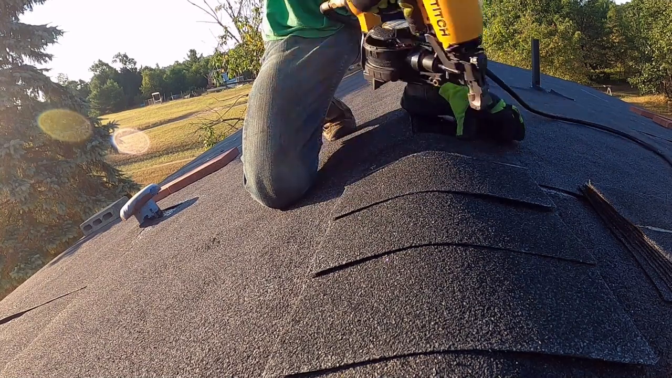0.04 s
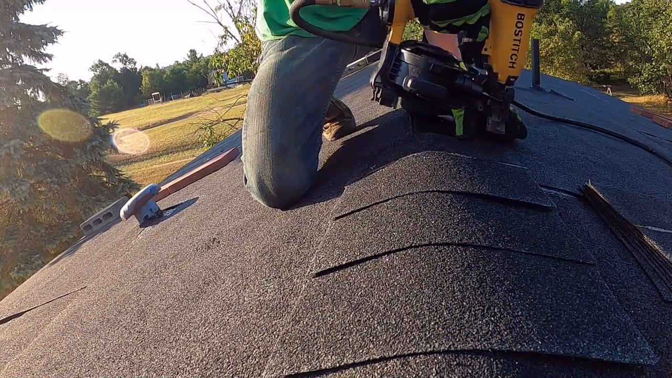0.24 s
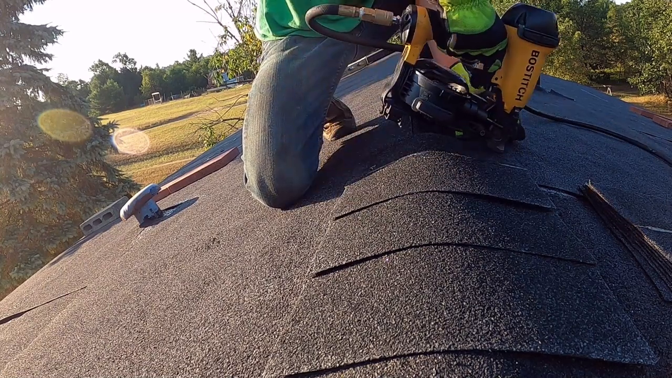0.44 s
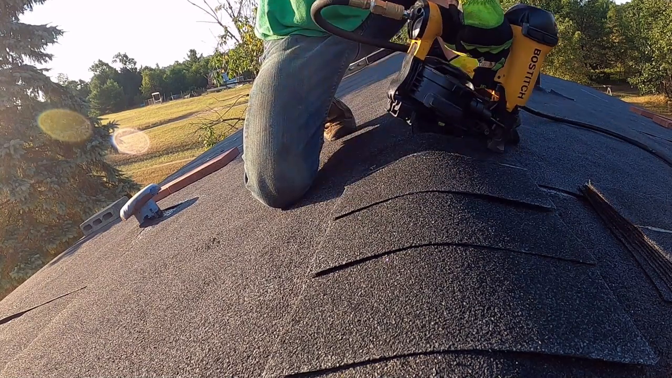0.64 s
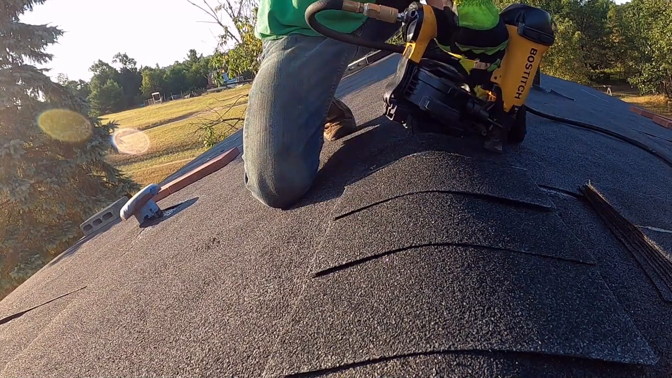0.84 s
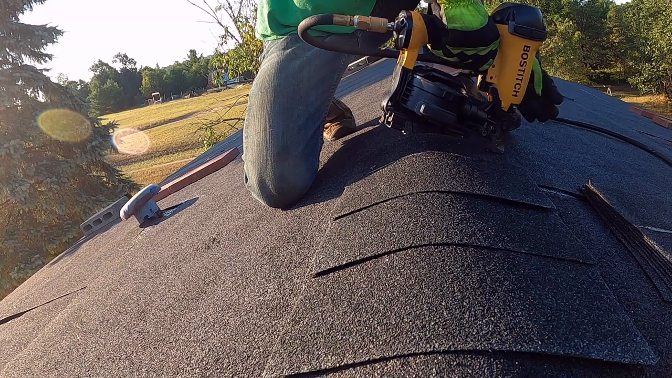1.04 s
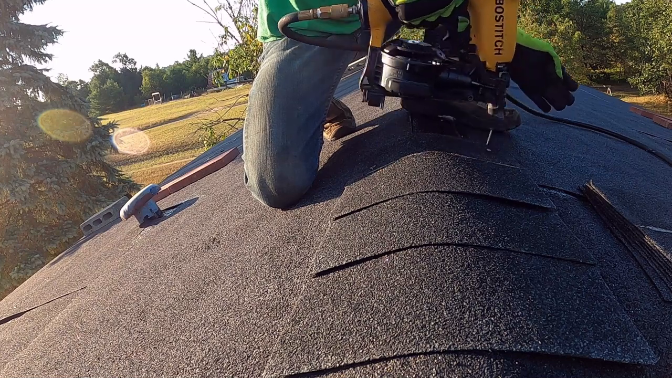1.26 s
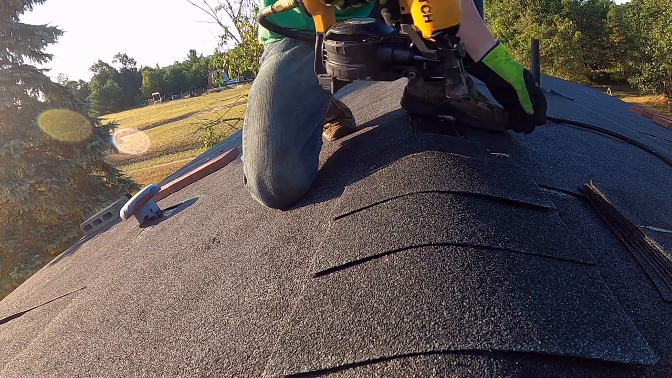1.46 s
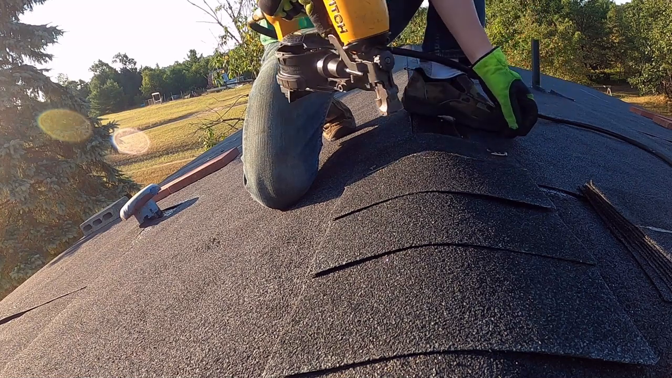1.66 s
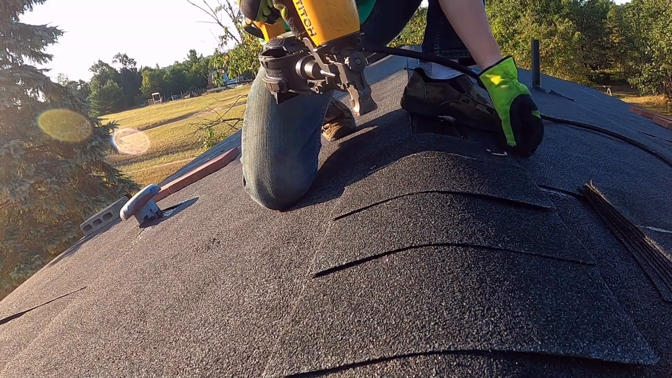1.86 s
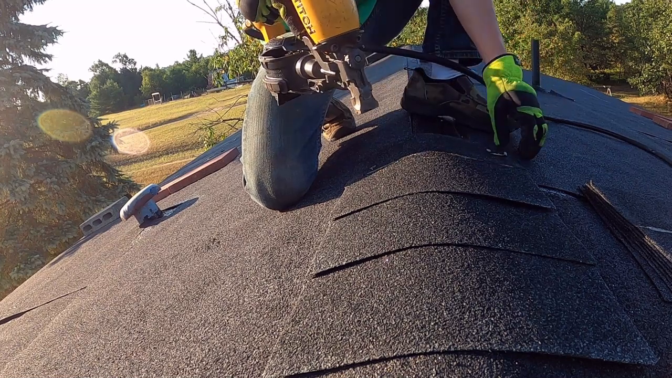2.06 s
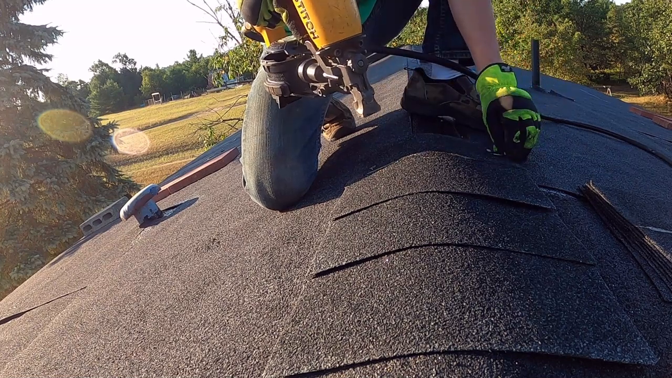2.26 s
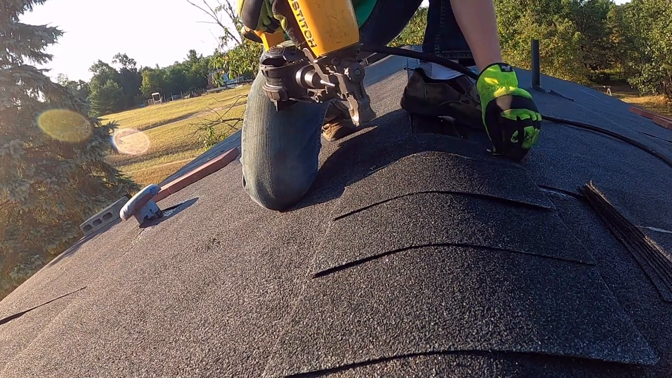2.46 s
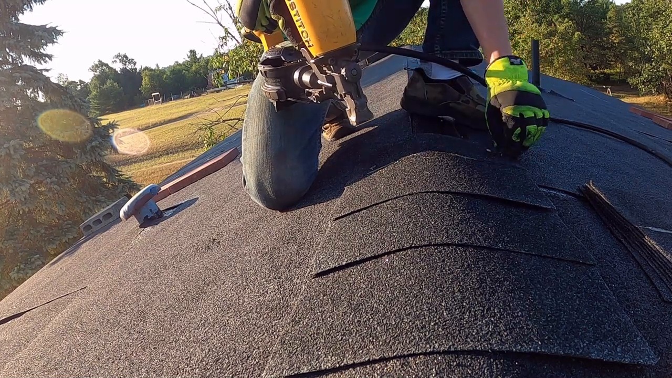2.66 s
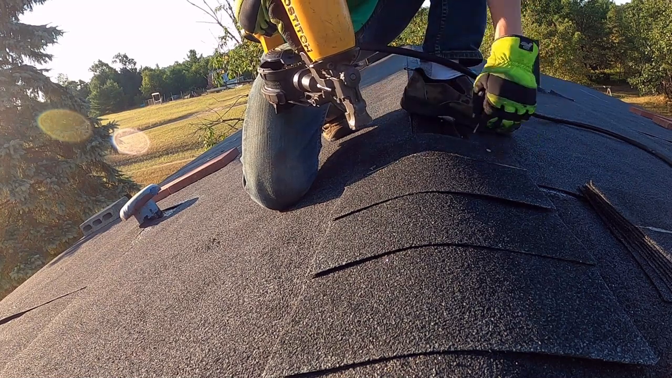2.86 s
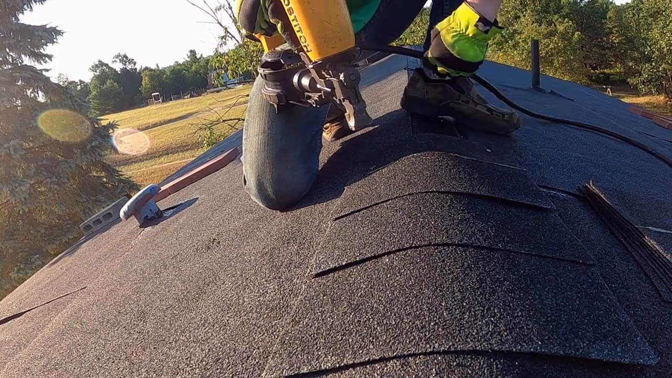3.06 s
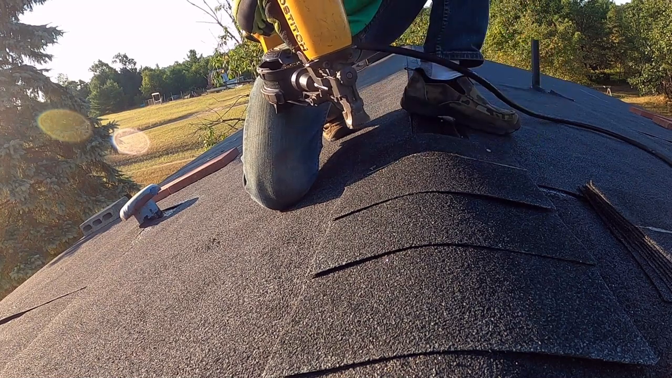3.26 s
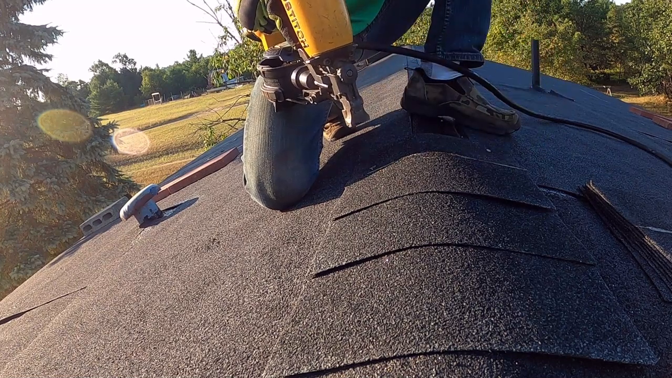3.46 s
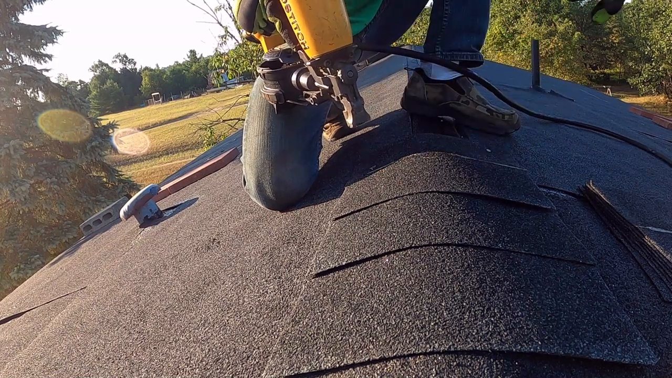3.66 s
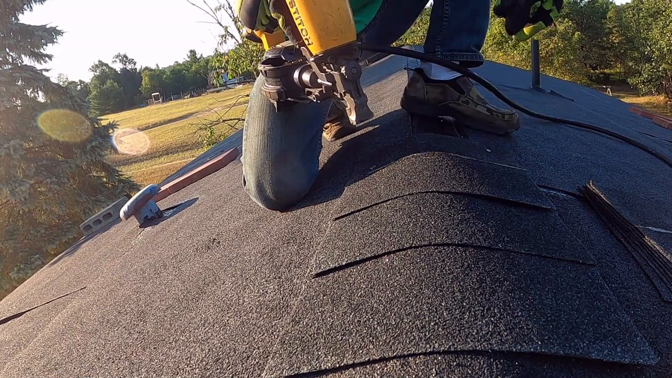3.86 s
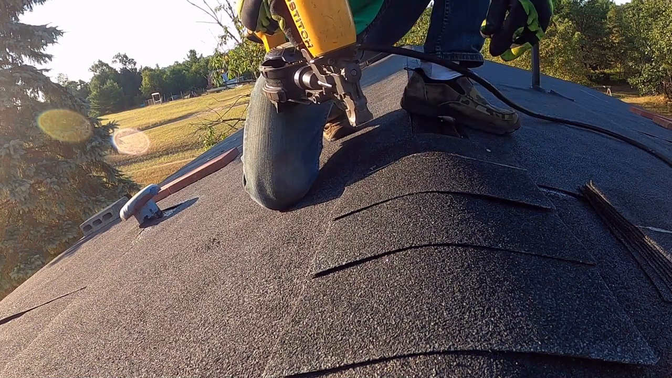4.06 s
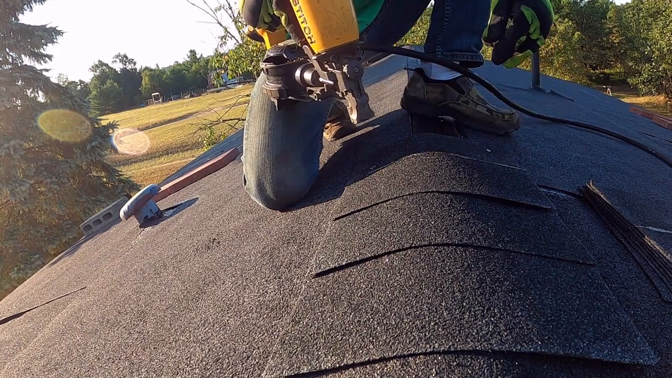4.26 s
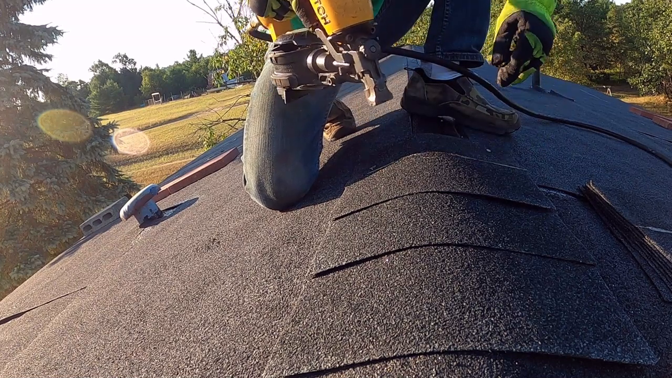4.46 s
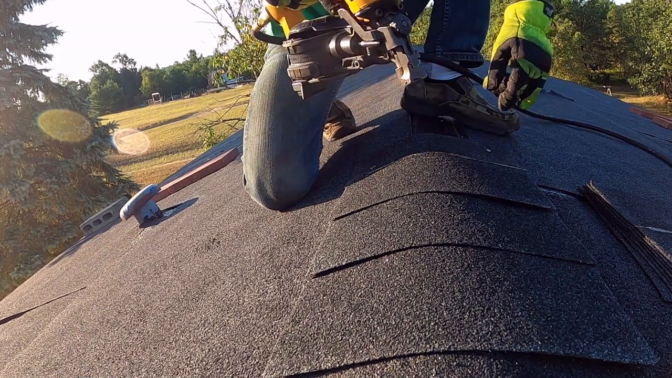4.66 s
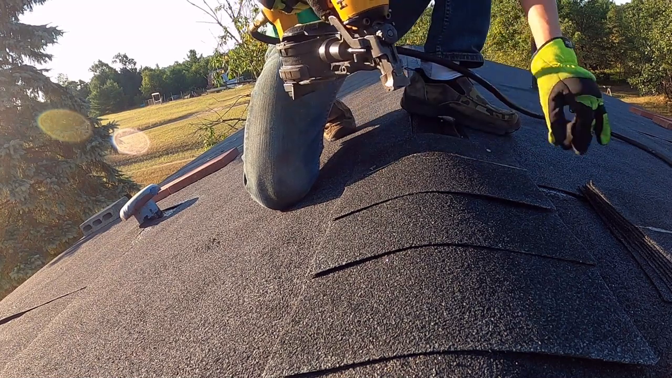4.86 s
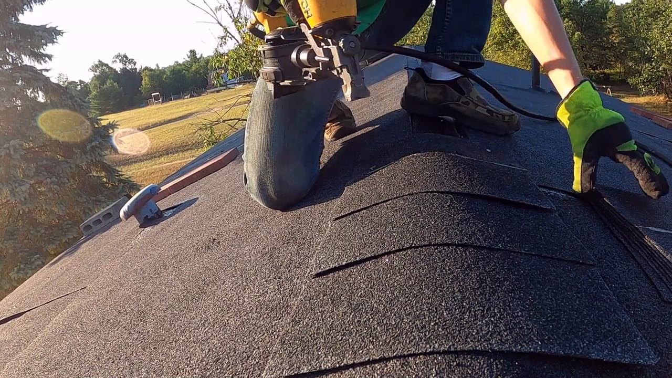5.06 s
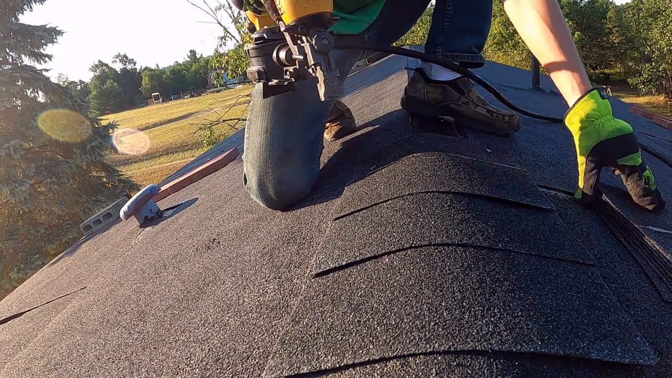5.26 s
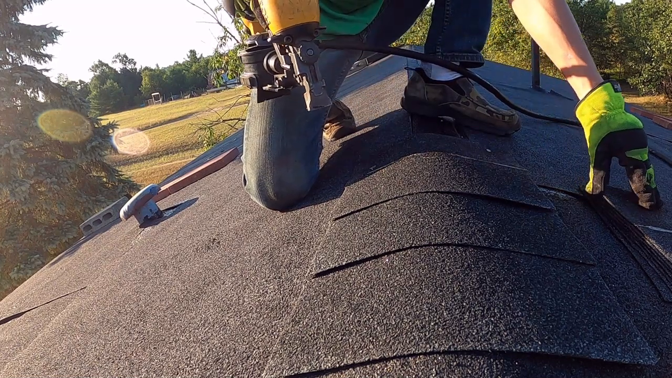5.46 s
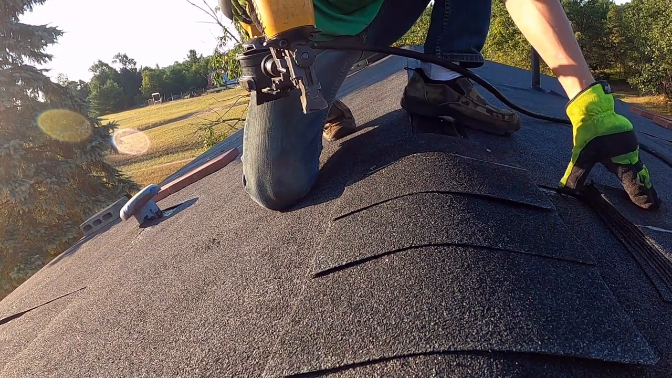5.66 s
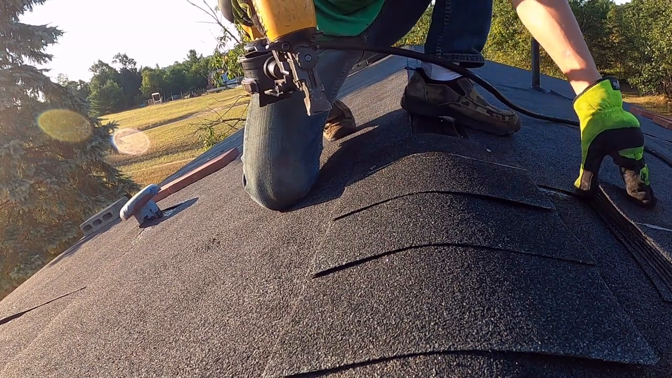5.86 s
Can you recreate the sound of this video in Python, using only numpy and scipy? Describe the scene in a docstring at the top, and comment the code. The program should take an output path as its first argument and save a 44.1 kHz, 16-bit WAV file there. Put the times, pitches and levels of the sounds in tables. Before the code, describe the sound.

An air compressor drones steadily under an outdoor rooftop. Small clicks, a scrape and soft thumps come first, then about a second in a pneumatic nailer fires a very loud, ragged double crack with deck thump and a burst of exhaust air. The drone dips after the shot and creeps back, with sparse clicks, light thumps and final gritty scrapes. Close stereo microphone, light wind.

```python
"""A pneumatic roofing nailer fires through shingles into a wooden roof deck: the driver cracks and rings the steel,
the tool bounces, fires again and vents coloured noise as air, and damped sines thump in the deck.
A compressor drones below as overtones of its stroke, with noise for rushing air and a buffeting breeze.
Weight shifts, clicks, a brushing sleeve and glove scrapes surround the shots; the yard echoes the roof work.
A gain control starts ducked, drops at loud sound and slowly recovers."""
import sys
import numpy as np
from scipy import signal
from scipy.fft import rfft, irfft
from scipy.io import wavfile
from scipy.ndimage import uniform_filter1d

SR = 44100
rng = np.random.default_rng(int(sys.argv[2]) if len(sys.argv) > 2 else 0)


def to_wav(s):
    """Save 16-bit WAV."""
    ch = np.atleast_2d(s).T  # columns
    pcm = np.round(np.clip(ch, -1, 1) * 32767)  # PCM
    wavfile.write(sys.argv[1], SR, pcm.astype(np.int16))


N = 260631
T = np.arange(N) / SR
STROKE_HZ = 56.71  # compressor speed, strokes per second
EDGE_HZ = 15800  # top of the audible band here

# All spectrum levels are relative; noise is scaled to rms 1 after colouring.
# compressor hum, used from the second overtone of the stroke up: [multiple of stroke rate, level/dB]
HUM_OVERTONES = [(1, -5), (2, 0), (3, -17), (4, -2), (5, -12), (6, -7), (7, -15), (8, -15), (9, -15),
                 (10, 0), (11, -8), (12, -14), (13, -20), (14, -25), (15, -31), (16, -24), (17, -24),
                 (18, -23), (19, -25), (20, -30), (21, -28), (22, -22), (23, -17), (24, -26), (25, -26),
                 (26, -27), (27, -38), (28, -28), (29, -32), (30, -20), (31, -33), (32, -34), (33, -29),
                 (34, -33)]
# ringing lines of the compressor casing: [f/Hz, level/dB]
CASING_LINES = [(2153, -70), (2379, -67), (2891, -72), (3007, -75), (3628, -71), (3688, -68), (3854, -65),
                (4199, -68), (4366, -70), (4538, -75), (4764, -68), (4990, -72), (6293, -80), (7149, -81)]
# spectrum of the valve clatter: [f/Hz, level/dB]
CLATTER_SPECTRUM = [(1900, -3.5), (2400, 3.5), (3200, -3.5), (4400, 6), (5200, -2.5), (6000, -7),
                    (7600, -6.5), (8300, -18), (9900, -15.5), (11300, -22), (12200, -19.5), (15000, -45)]
# spectrum of the compressor's air and fan: [f/Hz, level/dB]
RUSH_SPECTRUM = [(60, 8.5), (200, -2.5), (400, -1.5), (640, -0.5), (830, -9), (1400, -11), (2000, -16.5),
                 (3200, -18), (3800, -15.5), (4700, -17), (6000, -25.5), (7700, -31), (8200, -32.5),
                 (9900, -33), (11300, -54.5), (13300, -43), (15500, -55)]
# broad resonances of the compressor housing: [f/Hz, width/Hz, lift/dB]
HOUSING_RESONANCES = [(1350, 160, 2.5), (1645, 23, 2.5), (2390, 73, 0.5), (3900, 110, 1), (4120, 120, 0),
                      (4570, 65, 0.5), (6440, 200, 1.5), (7300, 116, 4.5), (7720, 170, 6),
                      (11700, 110, 11.5), (12200, 160, 7.5)]
# spectrum of the breeze on the microphone: [f/Hz, level/dB]
BREEZE_SPECTRUM = [(10, -35), (28, 14.5), (55, 8.5), (90, 0.5), (150, -12.5), (300, -31.5), (900, -77)]
# breeze strength as it freshens, lulls and returns: [t/s, level/dB]
BREEZE_STRENGTH = [(0, -46), (1.85, -39.5), (2.4, -33), (3.0, -32), (3.3, -56), (4.1, -39), (5.9, -36)]
# strokes of tool nose and glove over gritty shingle: [t/s, hold/s, level/dB]
DRAG_STROKES = [(.525, 0.075, -46), (2.72, .04, -56), (5.465, 0.029, -42.5), (5.55, 0.048, -49.5),
                (5.825, 0.068, -44)]
# spectrum of the scraped granules: [f/Hz, level/dB]
GRIT_SPECTRUM = [(400, -20), (1200, -5), (1800, 5), (2400, 4), (3500, 1), (6000, -7.5), (8000, -11.5),
                 (11000, -23), (15500, -29)]
# small clicks of trigger, safety nose and grit: [t/s, level/dB, t60/s, lowest f/Hz, highest f/Hz]
CLICK_EVENTS = [(0.52, -30, 0.056, 1100, 4200), (.532, -27, 0.045, 1300, 4150),
                (0.543, -29, 0.037, 1200, 4000), (0.5574, -16, 0.019, 1220, 3640),
                (0.5906, -26.5, 0.024, 1700, 4540), (.877, -35, 0.008, 3500, 7000),
                (.909, -33, 0.0065, 3800, 8000), (1.2216, 5.5, 0.008, 1800, 5170),
                (1.4193, -20, 0.015, 750, 3210), (1.4848, -14.5, 0.0067, 2300, 6900),
                (1.491, -23, 0.014, 1100, 5900), (1.518, -31, .01, 3000, 7500),
                (1.6224, -35, .015, 2000, 4500), (1.664, -42, 0.01, 6000, 8500),
                (2.7155, -35, 0.016, 1800, 4000), (2.744, -41, 0.025, 1700, 2600),
                (3.391, -42, .05, 1600, 2800), (5.304, -39.5, 0.022, 1700, 3800),
                (5.513, -29.5, 0.011, 2000, 3900), (5.557, -42, 0.025, 1700, 4000),
                (5.8652, -29.5, 0.019, 1700, 3430)]
# thumps of the deck under tool, knee and boot: [t/s, level/dB, f/Hz]
DECK_THUMPS = [(0.534, -20, 85), (0.574, -19, 63.6), (0.592, -24, 103), (.61, -22, 55), (0.81, -24, 79),
               (1.0894, 9, 472), (1.0911, 11, 202), (1.099, 9.5, 183), (1.104, 3, 63), (1.128, 1, 147),
               (1.137, 8, 203), (1.176, -1.5, 160), (1.227, 4.5, 106), (1.2535, 8, 156), (1.255, -6, 483),
               (1.2649, 0, 135), (1.621, -23, 55.4), (2.234, -20.5, 72), (2.335, -23.5, 45.4),
               (2.613, -27, 60.4), (2.652, -11, 87), (2.66, -15, 175), (2.753, -22, 102), (3.014, -25, 86),
               (4.088, -23, 52.3), (5.114, -26, 75)]
# spectrum of the spitting trigger valve: [f/Hz, level/dB]
SPIT_SPECTRUM = [(300, -4), (1500, -5), (2600, 1), (3600, -9), (4600, -3), (5600, -1), (7200, -17),
                 (9500, -2), (11500, -24), (15500, -30)]
# blows of the driver and bouncing nose: [t/s, level/dB, crack t60/s, brightness/dB per octave]
DRIVER_BLOWS = [(1.0896, 2, 0.031, 0), (1.0990, 4.5, 0.045, -5), (1.1032, -2, 0.049, 6),
                (1.1365, -1.5, 0.06, -5), (1.153, -4.5, 0.015, 3), (1.157, -1.5, 0.055, 4.5),
                (1.1748, -12, 0.082, 2.5), (1.242, -27, 0.017, -4), (1.256, -5, 0.073, -6.5),
                (1.2728, -14.5, 0.035, 6)]
# modes of the nailer's steel body: [f/Hz, level/dB, t60/s]
STEEL_MODES = [(1020, -3, .035), (1140, -4, .05), (1740, -10, .06), (2010, -4, .07), (2805, -4, .07),
               (2980, -5, .06), (3400, -7, .05), (3775, -5, .06), (4560, -5, .06), (5380, -10, .06),
               (7755, -14, .08), (9020, -12, .04)]
# spectrum of the driver's crack before each blow's tilt: [f/Hz, level/dB]
CRACK_SPECTRUM = [(100, -14), (350, 9.5), (600, 3), (1000, 7.5), (1450, -1.5), (2800, 0.5), (5000, -11),
                  (7500, -16.5), (9800, -22.5), (11500, -34), (15500, -37)]
# puffs of air from the exhaust cap: [t/s, hold/s, level/dB]
EXHAUST_PUFFS = [(1.114, 0.017, -11), (1.157, .008, -16), (1.213, .008, -36), (1.234, 0.0097, -3)]
# spectrum of the exhaust jet: [f/Hz, level/dB]
JET_SPECTRUM = [(200, 14.5), (600, -9.5), (1200, -3), (1900, -5.5), (3000, -6), (4300, 4), (5800, -5),
                (7100, -0.5), (8200, -8.5), (10000, -6.5), (12000, -19), (15500, -20)]
# starting spectrum of the echo from trees and yard: [f/Hz, level/dB]
YARD_SPECTRUM = [(60, -0.5), (200, -17), (700, 4.5), (1100, 7.5), (2000, 0), (6000, -2), (10000, 5),
                 (15000, 4)]
# decay of the yard echo: [f/Hz, t60/s]
YARD_DECAY = [(100, 0.47), (1000, 1), (4000, 0.97), (12000, .55)]
# difference between the two microphone ports, before each group's offset: [f/Hz, side level/dB]
PORT_SIDE = [(200, -82), (1300, -50), (2400, -25), (4400, -27.5), (6000, -15), (9300, -12.5), (10600, -16),
             (12200, 1), (15000, 3)]
# tonal lean of the ports: [f/Hz, left minus right level/dB]
PORT_LEAN = [(8000, 0), (11000, 0), (13000, -5), (15500, -5)]


def amp(db):
    """Decibels to gain."""
    return 10 ** (np.asarray(db) / 20)


def unit(x):
    """Scales to rms 1."""
    return x / np.sqrt(np.mean(x ** 2) + 1e-20)


def read(points, hz):
    """Reads a table of values on a log-frequency axis."""
    f, value = np.transpose(points)
    return np.interp(np.log(hz + 1), np.log(f + 1), value)


def level(points):
    """A dB curve over time as a gain at every sample."""
    return amp(np.interp(T, *np.transpose(points)))


def add(mix, s, sound):
    """Mixes a sound in at time s, cut off at the end of the mix."""
    part = mix[round(s * SR):][:len(sound)]
    part += sound[:len(part)]


def colour(x, points):
    """Filters a sound by a spectrum table and scales it to rms 1."""
    hz = np.fft.rfftfreq(len(x), 1 / SR)
    return unit(irfft(rfft(x) * amp(read(points, hz)), len(x)))


def noise(points, size=N):
    """Noise of rms 1 with the given spectrum."""
    return colour(rng.standard_normal(size), points)


def drift(rate_hz):
    """Random wander of rms 1 that weakens steeply above rate_hz."""
    hz = np.fft.rfftfreq(N, 1 / SR)
    spectrum = rfft(rng.standard_normal(N)) / (1 + (hz / rate_hz) ** 4)
    return unit(irfft(spectrum, N))


def strike(t, t60, rise_s=0.0002):
    """Envelope of a hit: a fraction of a millisecond of contact, then a steady fall in dB."""
    return (1 - np.exp(-(t / rise_s) ** 2)) * amp(-60 * t / t60)


def swell(start, hold, attack_s, t60):
    """Envelope that climbs 60 dB in attack_s up to its start, holds, and dies away."""
    before = np.maximum(start - T, 0) / attack_s
    after = np.maximum(T - start - hold, 0) / t60
    return amp(-60 * (before + after))


def overtones(gains, phases, turns, size=4096):
    """A periodic sound locked to the piston: one overtone for each rms gain and phase (in turns)."""
    cycle = irfft(gains * np.exp(2j * np.pi * phases), size) * size / np.sqrt(2)
    return np.interp(turns % 1, np.arange(size) / size, cycle, period=1)


def housing(x):
    """Lifts the bands in which the compressor's housing resonates."""
    hz = np.fft.rfftfreq(N, 1 / SR)
    lift_db = sum(db / (1 + (2 * (hz - centre) / width) ** 2) for centre, width, db in HOUSING_RESONANCES)
    return irfft(rfft(x) * amp(lift_db), N)


def compressor(hum_db=-33.5, casing_db=-0.5, rush_db=-42.5, wobble=0.00077, chuff=0.033, smear=.43,
               putter_hz=(1130, 1480)):
    """The piston's strokes hum; valve clatter and rushing air sound through the housing."""
    clatter_db = -58
    turns = np.cumsum(STROKE_HZ * (1 + wobble * drift(15.3))) / SR
    k = np.arange(int(EDGE_HZ / STROKE_HZ))
    order, order_db = np.transpose(HUM_OVERTONES)
    hum = amp(np.interp(k, order, order_db))
    hum = hum * (k > 1) * (k <= order[-1])  # starts at twice the stroke rate; the breeze fills the band below
    hum = amp(hum_db) * hum / np.linalg.norm(hum)
    for hz, db in CASING_LINES:  # the casing picks out the overtones nearest to its resonances
        hum[round(hz / STROKE_HZ)] = amp(db + casing_db)

    # one overtone whines a little louder at first, then drops at once to a lower level
    whine_hz, whine_db, whine_late_db, whine_drop_s = 3686, -60, -63.5, 3.1
    whining = round(whine_hz / STROKE_HZ)
    whine_gain = amp(np.where(T < whine_drop_s, whine_db, whine_late_db))
    whine = whine_gain * np.sqrt(2) * np.sin(2 * np.pi * whining * turns)

    # low overtones smear into an even drone; those in the putter band arrive together, once per stroke
    low, high = np.round(np.array(putter_hz) / STROKE_HZ)
    phases = -smear * np.minimum(k, low) ** 2 / 2
    scatter = rng.random(len(k)) * (k > high)  # higher lines ring on in any phase
    pump = overtones(hum * (k != whining), phases + scatter, turns)
    pump = pump * amp(0.17 * drift(6.5))

    # clatter arrives by several paths that fade in the moving air, so its overtones come and go
    valves = amp(read(CLATTER_SPECTRUM, k * STROKE_HZ)) * (k > order[-1])
    paths = (drift(2.2) * overtones(valves, rng.random(len(k)), turns) for _ in range(8))
    clatter = unit(sum(paths))
    rush = noise(RUSH_SPECTRUM) * unit(1 + chuff * np.cos(2 * np.pi * turns))
    return pump + whine + housing(amp(clatter_db) * clatter + amp(rush_db) * rush)


def breeze(lumps_db=4.0):
    """Low-frequency noise with random lumps of level buffets the microphone."""
    return level(BREEZE_STRENGTH) * unit(noise(BREEZE_SPECTRUM) * amp(lumps_db * drift(6.6)))


def sleeve(start_s=0.14, hold_s=0.2, db=-53, attack_s=.12, t60=.25, centre_hz=1050):
    """Cloth brushes softly, as a swell of band noise, while the nailer is swung over."""
    peak_hz = centre_hz * 0.88
    band = [(centre_hz / 4, -30), (peak_hz, 0), (peak_hz, 0), (centre_hz * 2, -13), (centre_hz * 8, -35)]
    return amp(db) * swell(start_s, hold_s, attack_s, t60) * noise(band)


def scraping(attack_s=0.11, release_t60=.12, grain_db=5.5, catch_db=1.6):
    """Granules catch and slip in clumps under tool nose and glove."""
    pressure = sum(amp(db) * swell(s, hold, attack_s, release_t60) for s, hold, db in DRAG_STROKES)
    clumps_db = grain_db * np.minimum(drift(900), 2) + catch_db * drift(66)
    grains = rng.standard_normal(N) * amp(clumps_db)
    return pressure * colour(grains, GRIT_SPECTRUM)


def clicks(low_slope_db=15, high_slope_db=19, size=4096):
    """Short ticks, each a quickly dying band of noise with sloping skirts (dB per octave)."""
    out, t = np.zeros(N), np.arange(size) / SR
    for s, db, t60, low_hz, high_hz in CLICK_EVENTS:
        low_skirt = (low_hz / 4, -2 * low_slope_db)  # two octaves out
        high_skirt = (high_hz * 4, -2 * high_slope_db)
        hump = [low_skirt, (low_hz, 0), (high_hz, 0), high_skirt]
        add(out, s, amp(db) * strike(t, t60) * noise(hump, size))
    return out


def deck(rise_cycles=0.23, cycles=3.6, upper_ratio=2.236, upper_db=-12, size=8192):
    """Shingles damp the plywood to a few cycles of each thump's pitch; a weaker upper mode adds a knock."""
    out, t = np.zeros(N), np.arange(size) / SR
    for s, db, hz in DECK_THUMPS:
        turns = hz * t
        envelope = (1 - np.exp(-turns / rise_cycles)) * np.exp(-(2 * turns / cycles) ** 2 * 2)
        thump = np.sin(2 * np.pi * turns)
        knock = amp(upper_db) * np.sin(2 * np.pi * upper_ratio * turns)
        add(out, s, amp(db) * envelope * (thump + knock))
    return out


def trigger_valve(start_s=1.08, spit_db=-17, hold_s=.026, attack_s=.045, t60=.06):
    """Air whistles through the narrow valve, swelling just before the driver strikes."""
    return amp(spit_db) * swell(start_s, hold_s, attack_s, t60) * noise(SPIT_SPECTRUM)


def nailer(deck_echo=0.36, size=8192):
    """Each blow is a short crack that sets the steel body ringing; the roof just below throws it back."""
    ring_db = -10
    out, t = np.zeros(N), np.arange(size) / SR
    hz, mode_db, mode_t60 = np.transpose(STEEL_MODES)[:, :, None]
    for s, db, t60, tilt in DRIVER_BLOWS:
        phase = 2 * np.pi * rng.random(hz.shape)
        modes = amp(mode_db) * strike(t, mode_t60) * np.sin(2 * np.pi * hz * t + phase)
        ring = modes.sum(0)
        tilted = [(f, d + tilt * np.log2(f)) for f, d in CRACK_SPECTRUM]
        crack = noise(tilted, size) * strike(t, t60)
        blow = amp(db) * (crack + amp(ring_db) * ring)
        add(out, s, blow)
        echo_delay_s = rng.uniform(0.00054, 0.0015)  # varies from blow to blow as the tool bounces
        add(out, s + echo_delay_s, deck_echo * blow)
    return out


def exhaust(attack_s=0.031, shut_t60=0.053, drain_db=-13, drain_t60=0.18, flutter_db=1.5):
    """Turbulent air puffs from the cap and dies quickly; the cylinder drains more slowly beneath."""
    flow = np.zeros(N)
    for s, hold, db in EXHAUST_PUFFS:
        puff = swell(s, hold, attack_s, shut_t60)
        drain = amp(drain_db) * swell(s, hold, attack_s, drain_t60)
        flow += amp(db) * (puff + drain)
    return flow * noise(JET_SPECTRUM) * amp(flutter_db * drift(220))


def yard(x, wet_db=-23, build_s=0.025):
    """A thin outdoor echo that builds up from far surfaces, each band dying at its own speed."""
    hz, t, z = signal.stft(rng.standard_normal(SR), SR, nperseg=256)
    band_db = read(YARD_SPECTRUM, hz)[:, None] - 60 * t / read(YARD_DECAY, hz)[:, None]
    build = 1 - np.exp(-(t / build_s) ** 2)
    tail = signal.istft(z * amp(band_db) * build, SR, nperseg=256)[1]
    return amp(wet_db) * signal.fftconvolve(x, tail / np.linalg.norm(tail))[:N]


def ports(x, side_db, size=512):
    """Two close ports hear nearly the same bass; the microphone's body scatters the treble between them."""
    hz, spectrum = np.fft.rfftfreq(N, 1 / SR), rfft(x)
    burst = unit(rng.standard_normal(size) * np.linspace(1, 0, size))
    scatter = rfft(burst, N) / np.sqrt(size)
    side = amp(read(PORT_SIDE, hz) + side_db) * scatter
    lean = amp(read(PORT_LEAN, hz) / 2)  # half to each port, in opposite directions
    return irfft(spectrum * np.array([(1 + side) * lean, (1 - side) / lean]), N)


def scene(work_side_db=-3, drone_side_db=1.0):
    """Roof work with its echo, over compressor and breeze; each group has its own stereo scatter."""
    work = trigger_valve() + nailer() + exhaust() + deck() + clicks() + scraping() + sleeve()
    drone = compressor() + breeze()
    return ports(work + yard(work), work_side_db) + ports(drone, drone_side_db)


def record(dry, threshold_db=-12, depth_db=12.5, start_db=13.5, recover_db=8.0, knee_db=3.0):
    """Gain control, already ducked, drops at loud sound and creeps back; then soft overload and band limit."""
    power = uniform_filter1d((dry ** 2).mean(0), size=128)
    power_db = 10 * np.log10(abs(power) + 1e-12)
    over_db = np.minimum(2 * (power_db - threshold_db), depth_db)
    # hold the deepest drop so far, released at recover_db per second
    recovered_db = recover_db * T
    held_db = np.maximum(np.maximum.accumulate(over_db + recovered_db), start_db) - recovered_db
    duck_db = knee_db * np.logaddexp(0, held_db / knee_db)  # the last few dB return slowly
    ducked = dry * amp(-uniform_filter1d(duck_db, size=128))
    limited = ducked / (1 + (ducked / .84) ** 4) ** (1 / 4)
    lowpass = signal.firwin(511, EDGE_HZ, window=("kaiser", 9), fs=SR)
    return signal.oaconvolve(limited, lowpass[None], "same")


dry = scene()
out = record(dry)
to_wav(out)
```